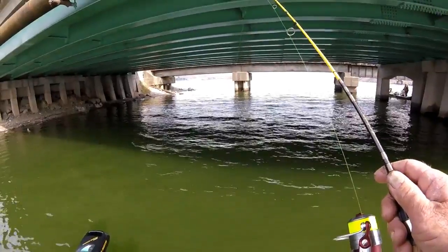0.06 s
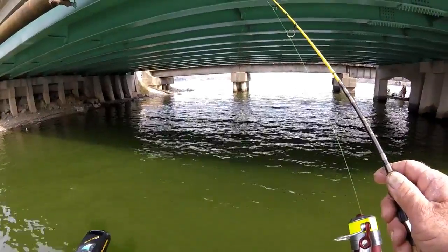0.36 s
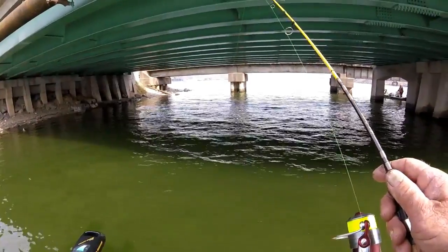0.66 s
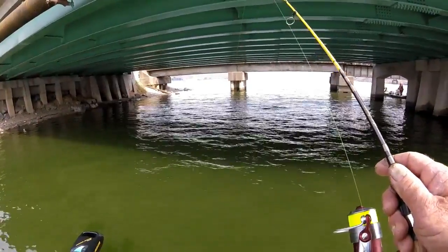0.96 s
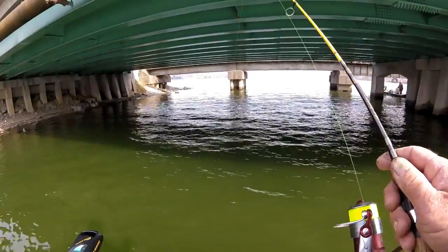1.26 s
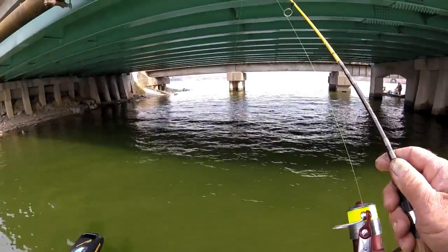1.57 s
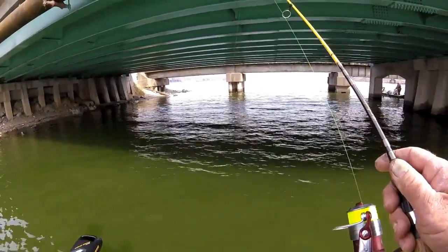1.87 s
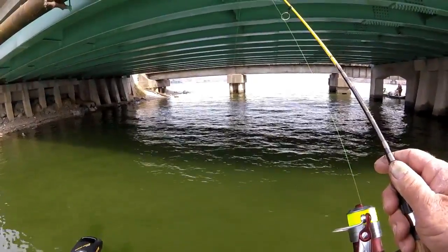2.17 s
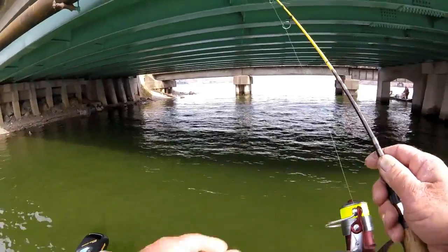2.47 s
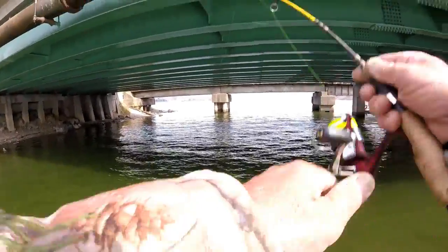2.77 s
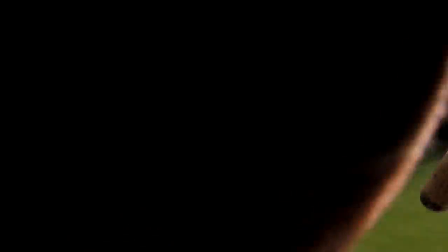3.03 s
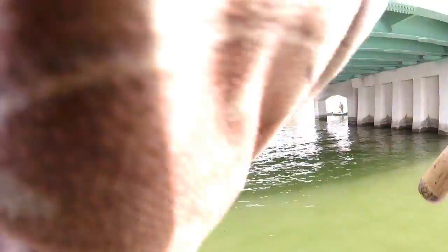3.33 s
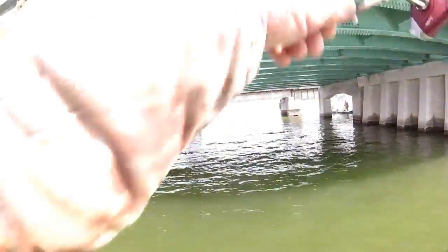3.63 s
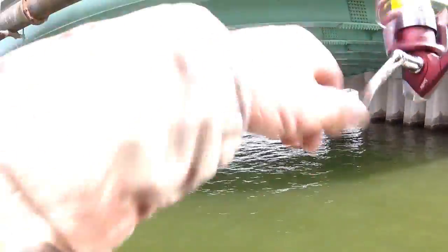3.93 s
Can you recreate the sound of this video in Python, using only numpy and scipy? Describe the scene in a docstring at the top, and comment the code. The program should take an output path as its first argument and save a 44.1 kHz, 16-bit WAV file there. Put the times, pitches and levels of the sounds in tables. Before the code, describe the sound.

A deep traffic rumble and tyre roar carry down to a microphone beneath a road bridge. Sparrows chirp now and then, two faint drips fall, and finally a fishing rod knocks, its reel clicks and a sleeve rustles close by.

```python
"""Traffic rumbles overhead, an engine hums and sparrows chirp, heard from one microphone just above the
water under a steel road bridge. Tyres roar, the deck heaves under its load and wheels thump over a joint.
The birds' buzzy whistles echo between girders and water; two drips fall. Near the end a sleeve brushes
past the microphone, its fibres catching and slipping, while a fishing rod knocks and its reel clicks."""
import sys
import numpy as np
from scipy import signal
from scipy.fft import rfft, irfft
from scipy.io import wavfile

SR = 44100
rng = np.random.default_rng(int(sys.argv[2]) if len(sys.argv) > 2 else 0)


def transcribe(signal):
    """Save signal, clipped to [-1, 1], as a 16-bit WAV file at the path in sys.argv[1]."""
    frames = np.atleast_2d(signal).T
    limited = np.clip(frames, -1, 1)
    pcm = np.round(limited * 32767).astype(np.int16)
    wavfile.write(sys.argv[1], SR, pcm)


N = 176400

# rumble of the deck overhead: (frequency [Hz], relative density [dB])
RUMBLE_SPECTRUM = [(18, 0), (32, -8), (52, -2.5), (70, -10), (105, -7.5), (130, -14.5), (230, -16.5),
                   (290, -23.5), (380, -23.5), (500, -26)]
# the rumble follows the load on the deck: (time [s], relative level [dB])
RUMBLE_LEVEL = [(0, 0), (.6, 0.5), (1.1, -1), (2.2, -1.45), (4, 1.55)]
# tyre roar from the road above: (frequency [Hz], relative density [dB])
TYRE_SPECTRUM = [(200, -18), (360, -2.5), (520, -11), (850, -3.5), (1310, -7), (1600, -17), (1950, -23.5),
                 (2600, -21), (3300, -27.5), (4100, -24.5), (4700, -36.5), (6800, -38), (11500, -51),
                 (13500, -64)]
# course of that roar: (time [s], relative level [dB])
ROAR_LEVEL = [(0, -41), (2.0, -41), (2.7, -43.5), (4, -43)]
# engine of a passing vehicle: (time [s], pitch [Hz], level [dB])
PASSING_ENGINE = [(0, 185.8, -43), (1.0, 183.2, -35.5), (1.8, 180.5, -36.5), (2.1, 178, -48.5),
                  (4, 181, -43.5)]
# sparrows near the microphone:
# (time [s], length [s], start pitch [Hz], middle pitch [Hz], end pitch [Hz], relative level [dB])
NEAR_CHIRPS = [(.005, 0.037, 4020, 4410, 4300, -44), (.007, 0.041, 4630, 5210, 4500, -45.5),
               (.044, .024, 4230, 4020, 3980, -43), (.075, 0.048, 4190, 4060, 3790, -49),
               (.088, 0.048, 4980, 5300, 6070, -51), (.538, 0.036, 3640, 5600, 4290, -42.5),
               (.577, 0.024, 3950, 3936, 3830, -45), (.609, 0.033, 3310, 3590, 3400, -47.5),
               (.636, 0.024, 3660, 4920, 4350, -48), (1.48, 0.043, 5200, 5840, 5940, -55),
               (1.518, 0.035, 3670, 4560, 4160, -43.5), (1.524, 0.065, 4650, 5100, 4460, -49.5),
               (1.568, 0.039, 3955, 4120, 4150, -46.5), (1.612, 0.034, 4300, 5260, 5650, -50),
               (1.96, 0.041, 3470, 5420, 4040, -45.5), (2.018, 0.036, 3480, 4840, 4250, -41.5),
               (3.173, 0.053, 3900, 5360, 4580, -43.5), (3.207, 0.027, 4420, 4100, 3950, -43.5),
               (3.6, 0.05, 4390, 5290, 3500, -44), (3.692, .027, 3700, 4700, 4120, -44)]
# birds far down the span:
# (time [s], length [s], start pitch [Hz], middle pitch [Hz], end pitch [Hz], relative level [dB])
FAR_CHIRPS = [(.16, 0.063, 3680, 3340, 2940, -59.5), (.505, 0.0523, 2970, 2806, 2700, -55),
              (1.155, 0.057, 4200, 4100, 3700, -70), (1.165, 0.1, 3400, 3280, 2930, -59.5),
              (1.645, 0.15, 3600, 3126, 2990, -59.5), (1.67, 0.031, 6730, 6500, 6400, -56.5),
              (2.06, 0.076, 3880, 3270, 2920, -55), (3.76, 0.076, 3090, 2854, 2560, -55),
              (3.84, 0.11, 4030, 3760, 2650, -52)]
# heaves of the deck: (time [s], peak level [dB])
DECK_HEAVES = [(.29, -18), (.6, -21.5), (1.879, -19), (1.975, -17), (2.53, -17.5), (3.16, -15),
               (3.525, -19)]
# wheels hitting the joint overhead: (time [s], strength [dB])
WHEEL_HITS = [(.381, -29), (.393, -23), (.411, -28), (.433, -30), (.46, -31), (.476, -32), (.495, -31)]
# modes of the joint: (frequency [Hz], ring time [s], gain [dB])
JOINT_MODES = [(194, 0.0048, 1), (365, 0.0081, 2.5), (636, 0.0037, -1.5), (734, 0.0058, -9.5),
               (1157, 0.0028, -9)]
# drips landing on the water: (time [s], strength [dB])
DRIP_HITS = [(1.445, -42), (1.766, -36)]
# ring of a drip: (frequency [Hz], ring time [s], gain [dB])
DRIP_MODES = [(2630, 0.00088, 3), (3120, 0.00034, -2), (6000, 0.00012, -5)]
# knocks on the rod: (time [s], strength [dB])
ROD_KNOCKS = [(2.478, -24), (3.022, -19.5), (3.04, -30)]
# modes of the rod: (frequency [Hz], ring time [s], gain [dB])
ROD_MODES = [(1043, 0.0023, -4), (1260, 0.0011, -4), (3030, 0.0003, -10)]
# pressure of the sleeve, heard as hiss: (time [s], relative level [dB])
RUB_LEVEL = [(2.5, -71), (2.72, -67.5), (2.9, -63.5), (3.04, -56), (3.09, -51), (3.14, -51.5), (3.16, -58),
             (3.215, -64), (3.24, -51.5), (3.285, -49), (3.32, -60), (3.43, -55), (3.465, -67), (3.53, -62),
             (3.63, -55.5), (3.76, -61.5), (3.85, -59.5), (3.99, -62)]
# cloth right at the microphone: (frequency [Hz], relative density [dB])
RUB_SPECTRUM = [(150, 4), (420, 8), (700, 7.5), (1300, 10), (2200, 6.5), (3200, 4), (4100, 9), (5200, 2.5),
                (6600, 5.5), (7900, -4.5), (13000, -11), (15000, -24)]
# dull scuff of the arm: (time [s], level [dB])
SCUFF_LEVEL = [(2.88, -51), (2.97, -38), (3.13, -36.5), (3.17, -72)]
# colour of that scuff: (frequency [Hz], relative density [dB])
SCUFF_SPECTRUM = [(300, 2), (1300, 5.5), (1900, -6.5), (2600, -3), (4000, -32)]
# clicks of the reel: (time [s], strength [dB])
REEL_CLICKS = [(2.938, -31.5), (3.081, -23.5), (3.542, -26), (3.569, -29), (3.595, -32), (3.627, -31)]
# metal modes of the reel: (frequency [Hz], ring time [s], gain [dB])
REEL_MODES = [(6630, 0.00077, -11), (6950, 0.006, -21), (8000, 0.0002, -11), (11300, .003, -27.5),
              (12900, 0.00014, -14.5)]


def from_db(db):
    """Decibels to gain."""
    return 10 ** (np.asarray(db) / 20)


def rms_one(x):
    """Scale to unit power."""
    return x / np.sqrt(np.mean(x ** 2) + 1e-20)


def clock():
    """Time of each sample [s]."""
    return np.arange(N) / SR


def in_time(rows):
    """One curve per column after the time, joining the rows by straight lines."""
    times, *columns = np.transpose(rows)
    return [np.interp(clock(), times, column) for column in columns]


def drift(rate_hz):
    """Random wander, mostly slower than rate_hz; spread 1."""
    step, settle = 40, 2000  # samples per point, points dropped
    pole = np.exp(-2 * np.pi * rate_hz * step / SR)
    white = rng.standard_normal(N // step + settle + 2)
    slow = signal.lfilter([1], [1, -2 * pole, pole * pole], white)[settle:]
    return np.interp(np.arange(N) / step, np.arange(len(slow)), rms_one(slow))


def coloured(x, spectrum):
    """Give a signal a smooth spectrum that falls off steeply beyond its ends; rms 1."""
    hz, db = np.transpose(spectrum)
    bins_hz = np.maximum(np.arange(N // 2 + 1) * SR / N, 1)
    skirts = np.minimum(1, np.minimum(bins_hz / hz[0], hz[-1] / bins_hz)) ** 4
    gain = from_db(np.interp(np.log(bins_hz), np.log(hz), db))
    return rms_one(irfft(rfft(x) * skirts * gain, N))


def noise(spectrum):
    """Coloured noise; rms 1."""
    return coloured(rng.standard_normal(N), spectrum)


def struck(hits, modes):
    """Each hit rings the modes, each with a slightly random strength; they swell briefly and die."""
    out, t = np.zeros(N + SR), np.arange(SR // 5) / SR
    for at_s, hit_db in hits:
        i = int(at_s * SR)
        for hz, ring_s, db in modes:
            gain = from_db(hit_db + db + rng.normal(0, 1))
            envelope = t / ring_s * np.exp(1 - t / ring_s)
            out[i:i + len(t)] += gain * envelope * np.sin(2 * np.pi * hz * t)
    return out[:N]


def span_echo(x, t60_s, split_hz=4350):
    """Dense echo between girders and water; above split_hz it dies twice as fast."""
    lowpass = signal.butter(12, split_hz, fs=SR, output="sos")
    bandpass = signal.butter(2, [split_hz, 2 * split_hz], "band", fs=SR, output="sos")
    dull = signal.sosfilt(lowpass, rng.standard_normal(N))
    bright = signal.sosfilt(bandpass, rng.standard_normal(N))
    fall_db = -60 * np.minimum(clock() / t60_s, 2)
    tail = dull * from_db(fall_db) + bright * from_db(2 * fall_db)
    return signal.fftconvolve(x, tail / np.sqrt(np.sum(tail ** 2)))[:N]


def traffic(rumble_db=-25.5, tyre_gain_db=2.5):
    """Overhead, the deck rumbles with its load and tyres roar on the road."""
    (load_db,), (roar_db,) = in_time(RUMBLE_LEVEL), in_time(ROAR_LEVEL)
    rumble = from_db(rumble_db + load_db) * noise(RUMBLE_SPECTRUM)
    tyres = from_db(tyre_gain_db + roar_db) * noise(TYRE_SPECTRUM)
    return rumble + tyres


def engines(hum_hz=153.85, hum_db=-30):
    """One steady hum and a fainter, less even passing engine that beats against it."""
    hz, db = in_time(PASSING_ENGINE)
    hum_gain = from_db(hum_db - 0.5 * drift(7.4))
    hum_phase = 2 * np.pi * np.cumsum(hum_hz + 0.15 * drift(4)) / SR
    passing_gain = from_db(db + 2 * drift(6))
    passing_phase = 2 * np.pi * np.cumsum(hz + 2 * drift(6.3)) / SR
    return np.sqrt(2) * (hum_gain * np.sin(hum_phase) + passing_gain * np.sin(passing_phase))


def whistles(notes, trill_hz=380, rasp_hz=300, overtone_db=-24):
    """Each note is a buzzy whistle whose pitch arches from start to end, with a breathy overtone."""
    out = np.zeros(N)
    warble = 1 + .009 * drift(280)
    trill = .3 * np.sin(2 * np.pi * trill_hz * clock() + 2 * drift(16))
    rasp = .24 * noise([(60, 0), (rasp_hz, 0)])
    flutter = rms_one(1 + trill + rasp)
    haze = from_db(overtone_db) * noise([(60, 0), (2 * rasp_hz, 0)])
    for at_s, length_s, start_hz, middle_hz, end_hz, db in notes:
        i = np.arange(int(at_s * SR), min(int((at_s + length_s) * SR), N))
        progress = np.linspace(0, 1, len(i))
        glide_hz = start_hz + (end_hz - start_hz) * progress
        arch_hz = (middle_hz - (start_hz + end_hz) / 2) * (1 - abs(2 * progress - 1) ** 2.6)
        phase = 2 * np.pi * np.cumsum((glide_hz + arch_hz) * warble[i]) / SR
        swell = np.clip(np.minimum(progress, 1 - progress) / .11, 0, 1)  # fades over 11% at each end
        tone = flutter[i] * np.sin(phase) + haze[i] * np.sin(2 * phase)
        out[i] += np.sqrt(2) * from_db(db) * swell * tone
    return out


def birds(direct_db=-2.5, girder_db=-6, span_db=-5, scatter_hz=330):
    """Near sparrows reach the microphone directly and by echo, far birds by blurred echo alone."""
    scatter = [(20, 0), (scatter_hz, 0)]  # multiplying by this noise band spreads the echo in pitch
    near = whistles(NEAR_CHIRPS)
    far = whistles(FAR_CHIRPS) * noise(scatter)
    off_girders = span_echo(from_db(girder_db) * near + far, t60_s=.13)
    down_span = span_echo(near * noise(scatter) + far / 2, t60_s=1.68)
    return from_db(direct_db) * near + off_girders + from_db(span_db) * down_span


def deck_heaves(centre_hz=46.64, half_width_s=.033):
    """The deck heaves under a load: short, deep swells, each at its own pitch."""
    out, t = np.zeros(N), clock()
    for at_s, db in DECK_HEAVES:
        hz = centre_hz * (1 + .18 * rng.uniform(-1, 1))
        swell = np.exp(-((t - at_s) / half_width_s) ** 2)
        out += from_db(db) * swell * np.sin(2 * np.pi * (hz * t + rng.random()))
    return out


def joint_thumps(echo_gain=.315):
    """Wheels strike the joint overhead and the deck rings on."""
    thumps = struck(WHEEL_HITS, JOINT_MODES)
    return thumps + echo_gain * span_echo(thumps, t60_s=.3)


def drips():
    """Drops hit the water with a brief ring."""
    return struck(DRIP_HITS, DRIP_MODES)


def tackle():
    """Knocks ring the rod; the metal reel gives small, bright clicks."""
    return struck(ROD_KNOCKS, ROD_MODES) + struck(REEL_CLICKS, REEL_MODES)


def sleeve(rub_gain_db=10.5, fibres_per_s=14000, spread_db=2.8):
    """At the microphone, cloth fibres catch and slip in dense tiny clicks; the arm adds a dull scuff."""
    (rub_db,), (scuff_db,), t = in_time(RUB_LEVEL), in_time(SCUFF_LEVEL), clock()
    sizes = rng.standard_normal(N) * from_db(spread_db * np.minimum(rng.exponential(1, N), 4))
    slips = sizes * (rng.random(N) < fibres_per_s / SR)
    catch_db = 2 * drift(45)  # the cloth catches in small surges
    rubbing = t > RUB_LEVEL[0][0]
    scuffing = (t > SCUFF_LEVEL[0][0]) & (t < SCUFF_LEVEL[-1][0])
    hiss = from_db(rub_gain_db + rub_db + catch_db) * rubbing * coloured(slips, RUB_SPECTRUM)
    return hiss + from_db(scuff_db) * scuffing * noise(SCUFF_SPECTRUM)


def scene():
    """Everything at one microphone under the bridge, just above the water."""
    bridge = traffic() + engines() + birds() + deck_heaves() + joint_thumps()
    return (bridge + drips() + tackle() + sleeve())[None]


def record(dry, cutoff_hz=15000):
    """The top of the microphone's signal is cut steeply."""
    return signal.sosfilt(signal.ellip(10, .1, 80, cutoff_hz, fs=SR, output="sos"), dry)


dry = scene()
out = record(dry)
transcribe(out)
```